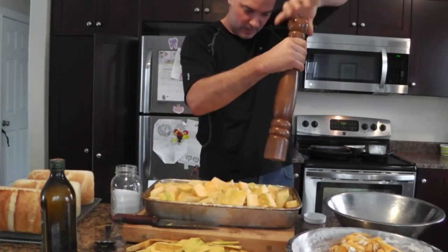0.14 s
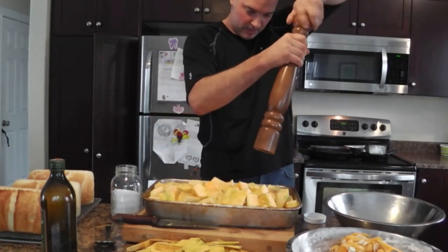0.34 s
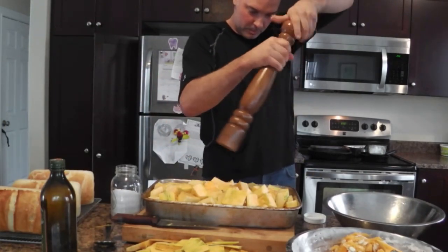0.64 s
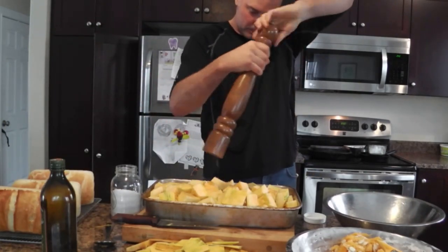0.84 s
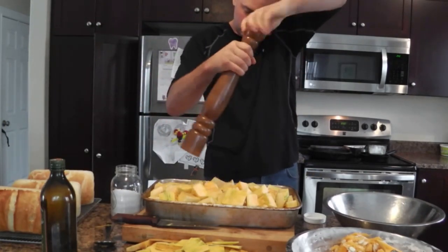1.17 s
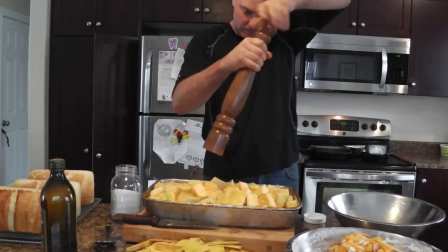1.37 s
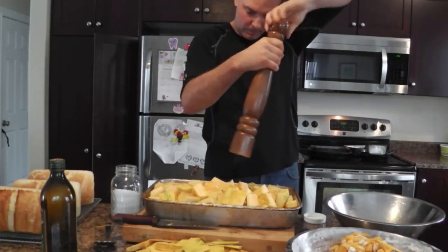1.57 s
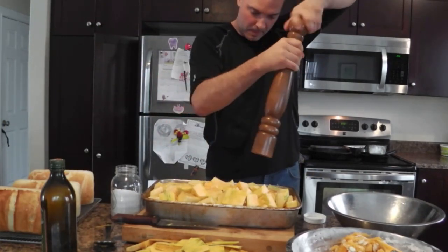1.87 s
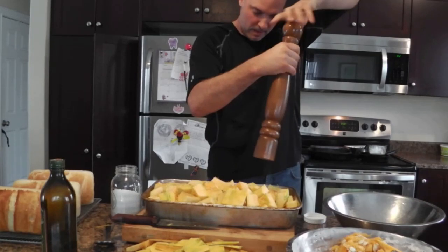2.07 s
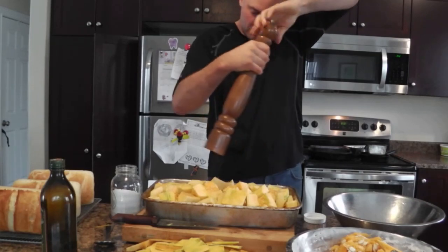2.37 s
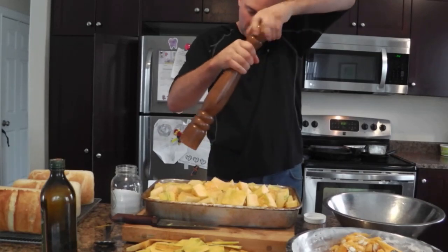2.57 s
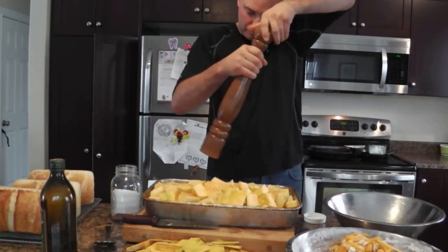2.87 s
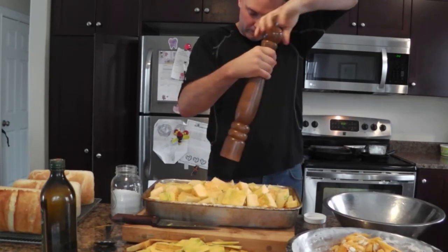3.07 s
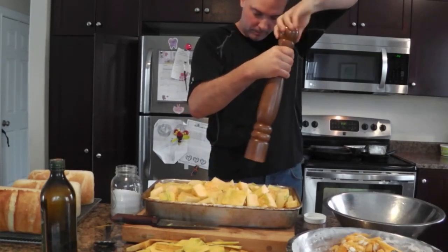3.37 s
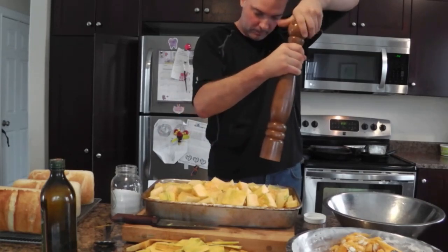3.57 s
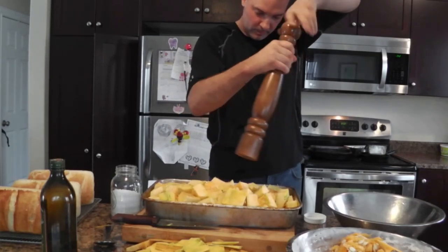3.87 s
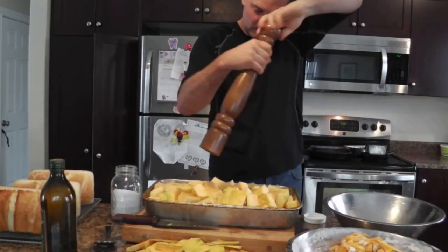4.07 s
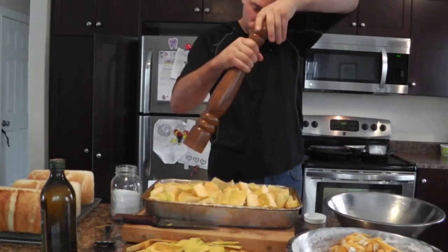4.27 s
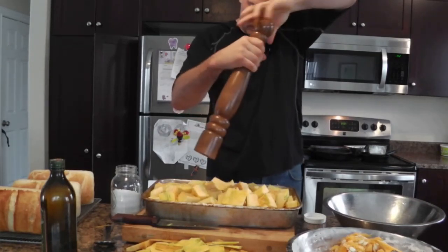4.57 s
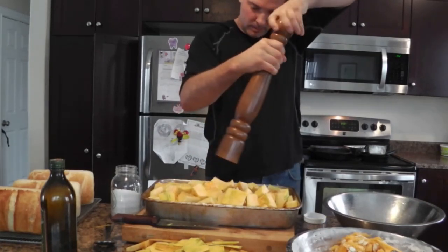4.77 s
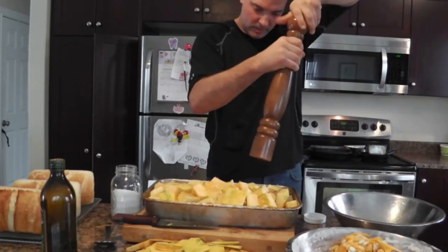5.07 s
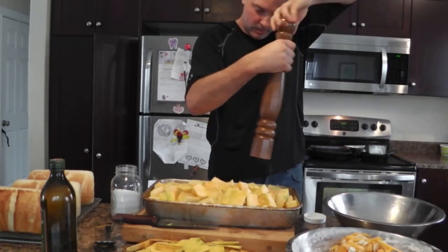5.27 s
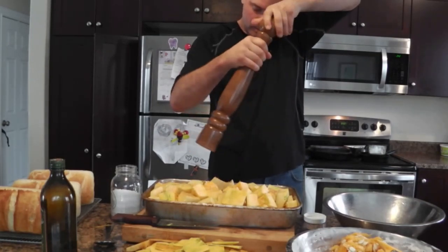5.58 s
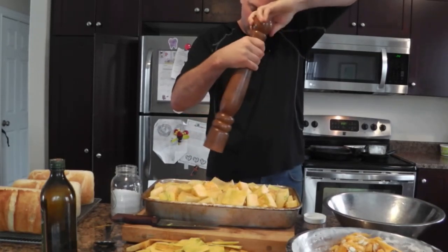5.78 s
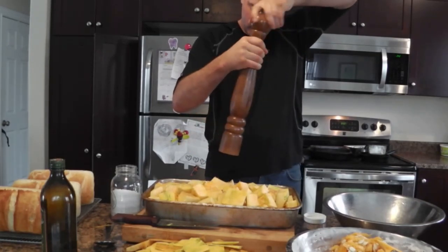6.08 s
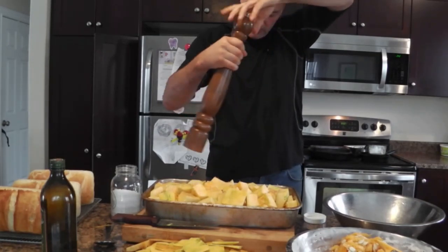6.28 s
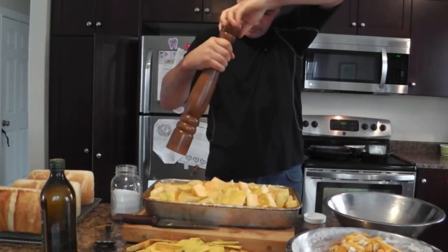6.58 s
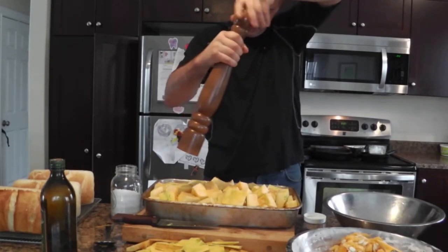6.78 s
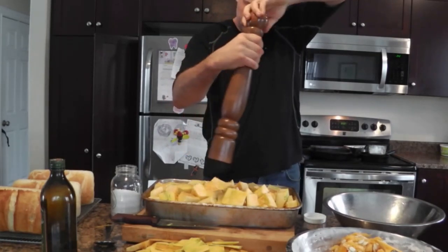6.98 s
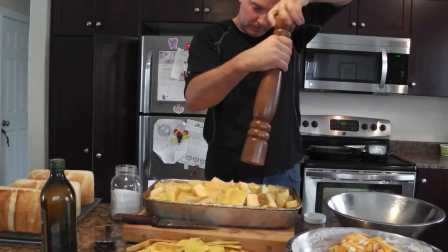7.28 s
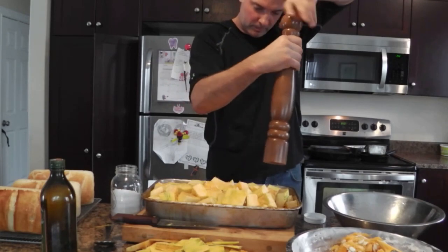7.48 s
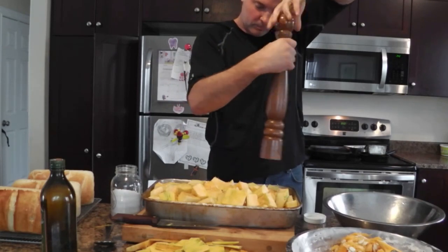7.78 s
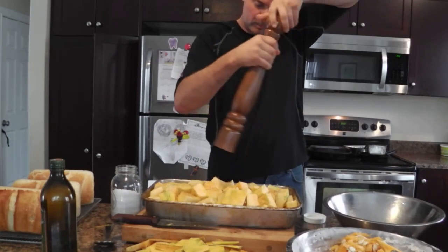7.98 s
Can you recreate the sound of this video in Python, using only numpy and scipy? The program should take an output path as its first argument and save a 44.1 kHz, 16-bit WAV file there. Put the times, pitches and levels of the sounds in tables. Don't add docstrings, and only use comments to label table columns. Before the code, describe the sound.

A tall wooden pepper mill is twisted by hand in a kitchen, about twenty crunchy, crackling grinds with sharp snaps and short bright echoes.

```python
import sys
import numpy as np
from scipy import signal
from scipy.fft import rfft, irfft, next_fast_len
from scipy.io import wavfile
from scipy.ndimage import uniform_filter1d, map_coordinates

SR = 44100
rng = np.random.default_rng(int(sys.argv[2]) if len(sys.argv) > 2 else 0)


def undo_db(level):
    steps = np.asarray(level, float) / 20
    return 10 ** steps


def to_wav(s):
    ch = np.atleast_2d(s).T
    pcm = np.round(np.clip(ch, -1, 1) * 32767)
    wavfile.write(sys.argv[1], SR, pcm.astype(np.int16))


N = 358533


def unit(x):
    return x / np.sqrt(np.mean(x ** 2) + 1e-20)


def along(points, hz):
    f, v = np.transpose(points)
    return np.interp(np.log(hz + 1), np.log(f + 1), v)


def filtered(x, response):
    n = x.shape[-1]
    m = next_fast_len(n + 8192)
    return irfft(rfft(x, m) * response(np.fft.rfftfreq(m, 1 / SR)), m)[..., :n]


def resonances(modes):
    def response(f):
        total = 0
        for k, (centre, width, db) in enumerate(modes):
            damping = 1j * f * width
            total = total + (-1) ** k * undo_db(db) * damping / (centre ** 2 - f ** 2 + damping)
        return total
    return response


def causal(points):
    def response(hz):
        cepstrum = irfft(np.log(undo_db(along(points, hz))))
        half = len(cepstrum) // 2
        cepstrum[1:half] *= 2
        cepstrum[half + 1:] = 0
        return np.exp(rfft(cepstrum))
    return response


def paired(two, alike):
    def mid_side(hz):
        turn = np.arccos(np.clip(along(alike, hz), -1, 1)) / 2
        return np.array([np.cos(turn), np.sin(turn)])
    mid, side = filtered(two, mid_side)
    return np.array([mid + side, mid - side])


def balanced(left_minus_right_db):
    return np.outer([0.5, -0.5], left_minus_right_db)


def wobble(rate):
    knots = rng.standard_normal(int(N * rate / SR) + 4)
    return map_coordinates(knots, [np.arange(N) * rate / SR])


# centre_hz, width_hz, level_db
LOW_WOOD_MODES = [(815, 390, -16), (1134, 120, 1.5), (1352, 223, -1.5), (1636, 546, -8.5)]
# centre_hz, width_hz, level_db
BORE_MODES = [(2009, 395, -3.5), (2227, 182, 3), (2482, 115, 1.5), (2834, 380, -21.5)]
# centre_hz, width_hz, level_db
BENDING_MODES = [(324, 194, 0), (498, 180, -1), (780, 235, -2)]
# freq_hz, gain_db
RADIATION = [(20, -64), (120, -29), (260, -6), (400, -1), (9000, 1), (15000, -7), (20000, -20)]


def mill():
    effort, bright_db, low_db, bore_lean_db, wrist_db = twisting_hand()
    effort = effort * unit(undo_db(2.5 * np.tanh(wobble(80))))

    shared = crushing(per_second=400, spread_db=1.5, scrape=0.71)
    knocks = unit(shared + 1.4 * crushing(per_second=200, spread_db=3, scrape=0.41))
    grit = unit(shared + 0.59 * crushing(per_second=1300, spread_db=6.5, scrape=0.32))
    shells = splinters(per_second=500, centre_hz=4600, cycles=2.8, spread_db=4)
    grit = unit(unit(burr_steel(grit)) + 0.8 * shells)
    snap_ring, snap_bore, snap_wood = loud_cracks()

    wood_force = knocks * effort * undo_db(low_db - 4.0 + 1.6 * wobble(45)) + snap_wood
    wood = wooden_body(wood_force, LOW_WOOD_MODES, lean_db=0.6)
    wrist = uniform_filter1d(effort, 1300) * undo_db(wrist_db)
    thrust = wrist * crushing(per_second=300, spread_db=-2.0, scrape=0.98)
    bending = undo_db(-17.5) * wooden_body(thrust, BENDING_MODES, lean_db=0)
    bore_force = shared * effort * undo_db(-3.0) + snap_bore
    bore = wooden_body(bore_force, BORE_MODES[::-1], bore_lean_db)
    burr = grit * effort * undo_db(bright_db - 2.0) + snap_ring
    return filtered(wood + bending + bore + burr, causal(RADIATION))


# start_s, climb_to_full_s, full_force_db, first_bite_below_full_db, fade_by_20_db_s
TWISTS = [(0.0, 0.0067, -17, -21.5, 0.1), (0.317, 0.076, -23, 12.5, 0.18), (0.736, .035, -20.5, -4.5, 0.12),
          (1.101, 0.087, -21.5, 8.5, 0.13), (1.503, 0.046, -20, 9.5, 0.1143), (1.859, 0.04, -20.5, 8, 0.15),
          (2.214, 0.1, -25.5, 1, 0.1), (2.566, 0.058, -22.5, -7, 0.16), (2.899, 0.09, -26, 6, 0.15),
          (3.296, 0.023, -22, 1, 0.14), (3.623, 0.092, -23.5, 13.5, 0.08), (3.968, 0.064, -22.5, 7, 0.1154),
          (4.368, 0.069, -25, 8, 0.17), (4.743, 0.12, -21.5, 5.5, 0.1442), (5.115, 0.13, -25, 2.5, 0.1447),
          (5.637, 0.023, -24.5, 2, .18), (6.065, 0.066, -32.5, -3.5, 0.12), (6.469, 0.097, -25, 17.5, 0.14),
          (6.863, 0.091, -26.5, -3.5, 0.08), (7.216, 0.095, -26, 9.5, 0.14),
          (7.572, 0.097, -24, 18.5, 0.18), (8.085, .014, -28.5, 2, -1)]
# burr_bright_db, low_wood_db, bore_lean_db, wrist_force_db
GRIPS = [(-2.5, -1, -2, 2), (-9, 2, -3, 4), (-3.5, -0.5, -2.5, -5), (-1.5, 1.5, -.5, -17),
         (-6.5, 0, -2, -4), (-2.5, 1.5, -2, -14), (-5.5, -1, -1.7, 4.5), (-7, -1.5, -0.2, 0),
         (-2.5, -2, -0.5, 7.5), (-1.5, 1, -2.5, .4), (-9.5, -3, -1.5, 3), (-3.5, 0, -0.5, 4.5),
         (-5, -2, 1, 5), (-4.5, -3, -0.1, 0.5), (-4.5, -0.5, 0, -2.5), (-6.5, 2, -1, 2), (-2, 1.5, -3, 3.5),
         (-7.5, -1, 0, 5.5), (-4.5, -1, 0.7, 3.5), (-6, 0.5, -0.5, 0), (-2, 0.5, -0.7, -9),
         (-2.5, 0, -1, 1.5)]
# start_s, length_s, force_db
TAKE_UPS = [
    (0.691, .04, -35),
    (1.463, 0.052, -35.5),
    (1.83, 0.03, -35),
    (2.2, .012, -40),
    (3.253, 0.037, -32),
    (4.351, .014, -42),
    (4.733, 0.014, -42),
    (5.625, .012, -39),
    (8.073, 0.015, -34.5),
]


def twisting_hand():
    t = np.arange(N) / SR
    effort, bright, low, bore_lean, wrist = np.zeros((5, N))
    for (start, climb, db, bite_db, fade), (bright_db, low_db, lean_db, wrist_db) in zip(TWISTS, GRIPS):
        on = slice(round(start * SR), N)
        age = np.abs(t[on] - start)
        late = age - climb
        climb_db = bite_db * np.clip(-late / climb, 0, 1) ** 2.33
        force_db = db - climb_db - 20 * np.maximum(late, 0) / fade
        effort[on] += np.minimum(age / 0.003, 1) * undo_db(np.maximum(force_db, -200))
        bright[on] = bright_db + 2 * late - 4 * np.exp(-age / 0.028)
        low[on] = low_db + 7 * np.exp(-age / 0.0068) - 38.5 * late
        bore_lean[on], wrist[on] = lean_db, wrist_db
    for start, length, db in TAKE_UPS:
        on = slice(round(start * SR), round((start + length) * SR))
        effort[on] += undo_db(db) * np.minimum((t[on] - start) / 0.004, 1).clip(0)
        bright[on], low[on] = -4, 5
    return effort, bright, low, bore_lean, wrist


def crushing(per_second, spread_db, scrape):
    chance, size, sign = rng.random(N), rng.exponential(size=N), rng.standard_normal(N)
    cracks = (chance < per_second / SR) * undo_db(np.minimum(spread_db * size, 13)) * np.sign(sign)
    return unit(unit(cracks) + scrape * rng.standard_normal(N))


def splinters(per_second, centre_hz, cycles, spread_db):
    u = rng.random((20000, 3))
    at = np.cumsum(-np.log(1 - u[:, 0]) / per_second)
    keep = at < N / SR
    hz = centre_hz * 2 ** (1.525 * (u[keep, 1:2] - 0.5))
    size = np.minimum((1 - u[keep, 2:3]) ** (-spread_db / 7.3), 9)
    k = np.arange(200)
    rings = size * np.sin(2 * np.pi * hz * k / SR) * np.exp(-k / SR * hz / cycles)
    samples = (at[keep, None] * SR).astype(int) + k
    return unit(np.bincount(samples.ravel(), rings.ravel(), N + len(k))[:N])


# freq_hz, level_db
BURR_COLOUR = [(1500, -3.5), (3000, -7.5), (3770, -0.5), (4500, -8.5), (5300, -0.5), (6300, -6.5),
               (7300, -17), (8600, -12), (10500, -20), (13000, -27), (15500, -46)]


def burr_steel(x):
    return filtered(x, causal(BURR_COLOUR))


# time_s, peak_db, ring_hz, bore_share_db
SNAPS = [(0.7376, -17, 5140, -9), (1.112, -25, 3900, -10), (1.1207, -19, 3680, 6),
         (1.1558, -6.5, 3700, 0.5), (1.5034, -15.5, 3760, -17), (1.8357, -25.5, 5070, -4),
         (1.8601, -12, 5030, -7), (1.9745, -11.5, 3620, -3.5), (2.2184, -23, 4940, -11),
         (2.2781, -15, 5200, -7), (2.5659, -12.5, 4220, -11), (2.904, -26, 5440, 8), (2.9794, -7, 5000, -7),
         (3.2981, -8, 4650, -5), (3.6547, -20, 3870, -14), (3.9854, -18.5, 3440, -10),
         (4.0216, -14, 3680, 3), (4.409, -25, 3690, -17), (4.745, -14, 4950, -19),
         (4.8165, -11.5, 5160, -4), (5.1603, -24, 4500, -8), (5.2015, -11, 5040, 2),
         (6.5233, -22, 5000, -2), (6.543, -25, 5370, -22), (6.8668, -16, 4180, 3), (7.2682, -24, 4600, -2),
         (7.287, -16.5, 4540, -1), (7.6525, -9.5, 3550, -4.5), (7.667, -6.5, 5220, -3),
         (8.086, -18, 4540, -7)]
# time_s, peak_db, ring_hz
TICKS = [(.013, -19, 3600), (0.027, -20, 5230), (0.405, -26, 3600), (6.123, -20, 3600),
         (0.6967, -30.5, 4890), (1.8451, -21.5, 5450), (2.2055, -27, 5240), (3.256, -30, 3380),
         (3.9698, -27, 4940), (4.37, -25, 5300), (5.1215, -30, 3240), (5.637, -32, 3460),
         (6.0818, -22, 4600), (6.479, -29, 5570), (6.5, -28, 4800), (7.219, -36, 3650), (7.2332, -26, 4830),
         (7.586, -38, 5100), (7.6385, -19.5, 4500)]
# time_s, peak_db, ring_hz, bore_share_db, low_wood_share_db
TAPS = [
    (0.6233, -40.5, 3380, 17.5, 18.5),
    (4.3217, -25.5, 3870, -2, -16),
    (7.5106, -29, 3940, 9, -5),
    (7.5258, -34, 3000, 12, -3),
    (7.538, -36, 3000, 15, -3),
    (7.5475, -44, 3000, 5, -3),
    (7.9983, -38, 3820, 9.5, 3),
    (8.026, -43, 3650, 5, -1),
]
# time_s, peak_db, bore_share_db
CATCHES = [(.739, -25, 7), (1.101, -33, 0), (1.463, -34, 3), (2.569, -24, -7), (2.576, -26.5, -18),
           (4.36, -36, -1), (4.731, -41, -3), (5.627, -35, -2), (6.069, -35, 20), (7.513, -36, 17),
           (8.073, -38.5, -4)]


def loud_cracks():
    t = np.arange(SR // 50) / SR
    ring, spray, bore, wood = np.zeros((4, N + len(t)))
    cracks = [(*row, -9.5) for row in SNAPS]
    cracks += [(*row, -8, -0.5) for row in TICKS]
    cracks += [tuple(row) for row in TAPS]
    cracks += [(s, db, 4000, bore_db, 14.5) for s, db, bore_db in CATCHES]
    ring_shape = undo_db(-60 * t / 0.003) * (1 - np.exp(-t / 0.0003))
    for s, db, hz, bore_db, wood_db in cracks:
        fizz = rng.standard_normal(len(t))
        start = round(s * SR)
        burst = np.sin(2 * np.pi * hz * t) + 0.057 * fizz
        ring[start:][:len(t)] += undo_db(db + 8.0) * ring_shape * burst
        spray[start:][:len(t)] += undo_db(db - 2.5 - 60 * t / 0.025) * fizz[::-1]
        bore[start] += undo_db(db + bore_db + 15.5)
        wood[start] += undo_db(db + wood_db + 15.5)
    return (ring + burr_steel(spray))[:N], bore[:N], wood[:N]


def wooden_body(force, modes, lean_db, flicker_db=1.1):
    norm = np.sqrt(np.mean(np.abs(resonances(modes)(np.linspace(1, SR / 2, num=4000))) ** 2))
    tips = np.linspace(-1, 1, len(modes[-3:]))
    tips = np.pad(tips, (len(modes) - len(tips), 0))

    def soft(mode):
        return lambda f: resonances([mode])(f) / (1 + 1j * f / (2.72 * mode[0])) ** 2

    total = np.zeros(N)
    for k, (mode, tip) in enumerate(zip(modes, tips)):
        push = force * undo_db(tip * lean_db + flicker_db * wobble(70))
        total += (-1) ** k * filtered(push, soft(mode))
    return total / norm


# freq_hz, t60_s
ROOM_DECAY = [(300, 0.24), (800, 0.67), (2100, 0.78), (5500, 0.74), (9000, 0.43), (15000, 0.51)]
# freq_hz, likeness (0-1)
ROOM_ALIKE = [(60, 0.43), (150, 0.29), (380, 0.91), (950, 1), (2380, 0.87), (5980, 0.19), (15000, 0.62)]


def kitchen(x):
    out = np.zeros((2, N + 2 * SR))
    edges = [round(row[0] * SR) for row in TWISTS[1:]]
    build_up = np.clip(np.arange(SR) / SR / 0.0064, 0, 1)
    for start, part in zip([0] + edges, np.split(x, edges)):
        hz, t, z = signal.stft(rng.standard_normal((2, SR)), SR, nperseg=256)
        decay = undo_db(-60 * t / along(ROOM_DECAY, hz)[:, None])
        tail = signal.istft(z * decay, SR, nperseg=256)[1][:, :SR]
        tail = paired(tail * build_up, ROOM_ALIKE)
        tail = undo_db(-1.56) * tail / np.linalg.norm(tail[0])
        tail[:, :SR // 40] += undo_db(-3.0) * worktop()
        wet = signal.fftconvolve(part[None], tail, axes=1)
        out[:, start:start + wet.shape[1]] += wet
    return out[:, :N]


# freq_hz, gain_db
GLINT_COLOUR = [(1500, -55.5), (4000, -5), (7000, -6), (15000, 7)]


def worktop():
    t = np.arange(SR // 40) / SR
    glints = rng.standard_normal((2, len(t))) * undo_db(-60 * t / 0.015)
    glints = filtered(glints / np.linalg.norm(glints[0]), causal(GLINT_COLOUR))
    return glints + (t == 0)


# freq_hz, likeness (0-1)
HUM_ALIKE = [(30, 0.32), (120, 0.69), (400, 0.7), (3000, 1), (10000, 1)]
# freq_hz, left_minus_right_db
HUM_BALANCE = [(25, -11), (60, -5), (125, -2), (400, -0.5)]


def low_drone(colour):
    noise = paired(rng.standard_normal((2, N)), HUM_ALIKE)
    return unit(filtered(noise, lambda hz: undo_db(along(colour, hz) + balanced(along(HUM_BALANCE, hz)))))


# freq_hz, level_db
HUM_COLOUR = [(20, -10.5), (53, -16), (115, -1), (230, -12.5), (600, -13), (1500, -14.5), (4000, -27.5),
              (9000, -51), (15500, -71)]
# time_s, level_db
HUM_LEVEL = [(0, -54.5), (3, -55.5), (5, -55), (8.13, -57.5)]


def appliances():
    level_db = np.interp(np.arange(N) / SR, *np.transpose(HUM_LEVEL)) + 7.5
    return undo_db(level_db) * low_drone(HUM_COLOUR)


# freq_hz, level_db
TRAFFIC_COLOUR = [(20, -16), (40, -3), (85, -4), (130, -5), (300, -20), (1000, -70)]
# time_s, level_db
TRAFFIC_LEVEL = [(0, -72), (3.7, -80), (4.3, -62), (4.8, -49), (5.4, -55), (5.9, -59), (8.13, -62)]


def traffic():
    level_db = np.interp(np.arange(N) / SR, *np.transpose(TRAFFIC_LEVEL))
    return undo_db(level_db) * low_drone(TRAFFIC_COLOUR)


# freq_hz, level_db
HISS_COLOUR = [(20, -30), (300, 1), (2000, 3.5), (6000, 0.5), (10000, -10.5), (14500, -15), (15700, -12)]


def microphone_hiss():
    noise = rng.standard_normal((2, N))
    return undo_db(-55.0) * unit(filtered(noise, lambda hz: undo_db(along(HISS_COLOUR, hz))))


def scene():
    return kitchen(mill()) + appliances() + traffic() + microphone_hiss()


def roll_off(x):
    return signal.sosfilt(signal.butter(12, 15670, fs=SR, output="sos"), x)


# freq_hz, left_minus_right_db
PORT_BALANCE = [(60, -3.5), (110, -2.5), (200, -6), (380, -0.5), (700, 1), (1290, 0), (2380, 1),
                (4400, 1.5), (8120, -0.5), (15000, -1)]


def record(dry):
    def microphone(hz):
        phase = along([(5500, -0.1), (6800, -1.42), (10200, -2.02)], hz)
        skew = np.exp(1j * balanced(phase))
        ports = undo_db(balanced(along(PORT_BALANCE, hz) * (hz > 300)))
        notch = undo_db(-16 * np.exp(-((hz - 7855) / 40) ** 2))
        return skew * ports * notch * (hz < 15780)
    return roll_off(filtered(dry, microphone))


dry = scene()
out = record(dry)
to_wav(out)
```